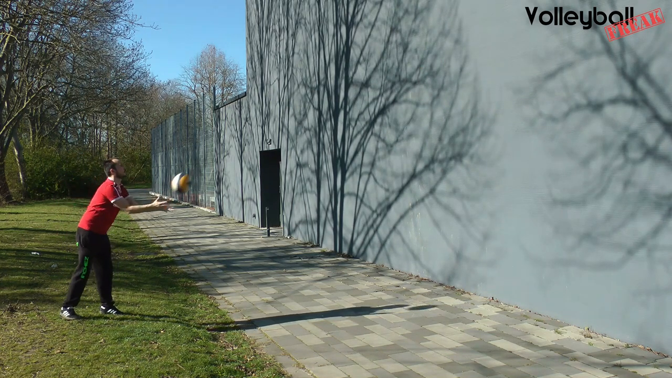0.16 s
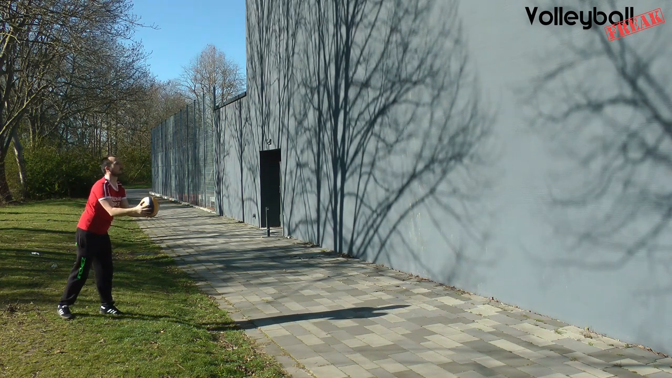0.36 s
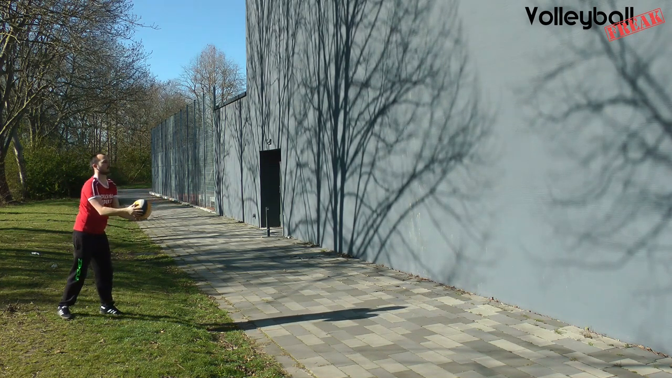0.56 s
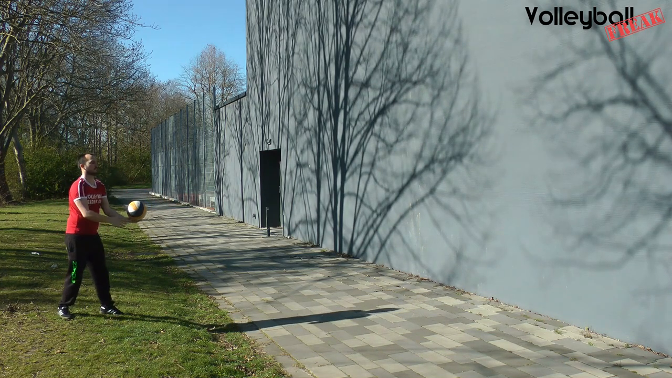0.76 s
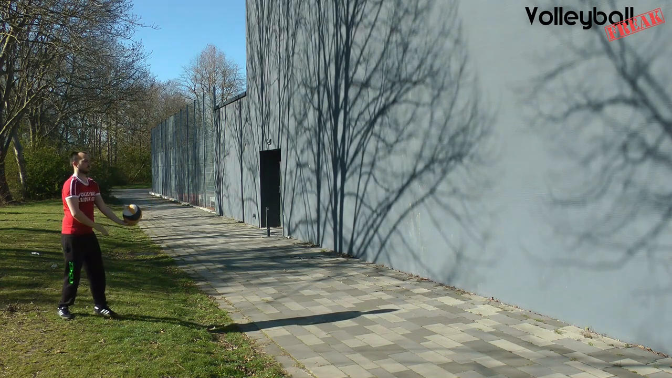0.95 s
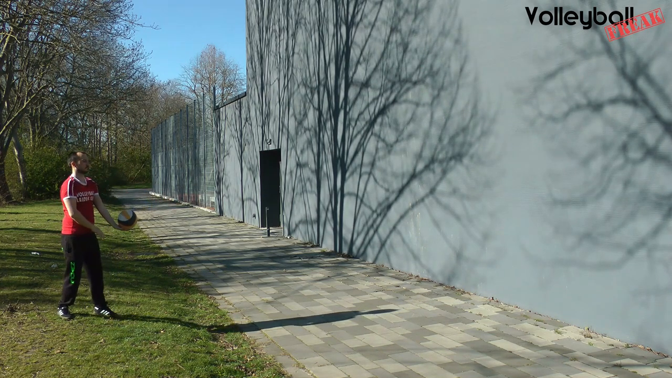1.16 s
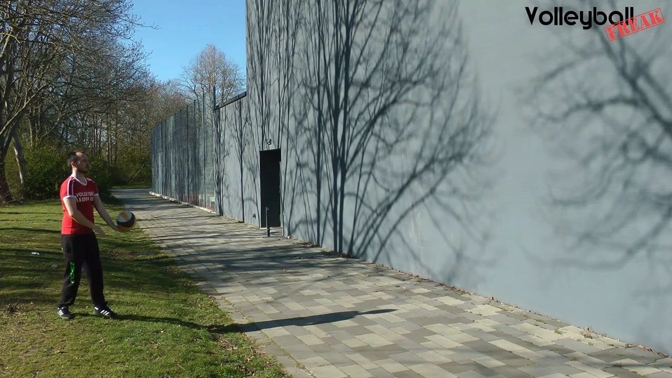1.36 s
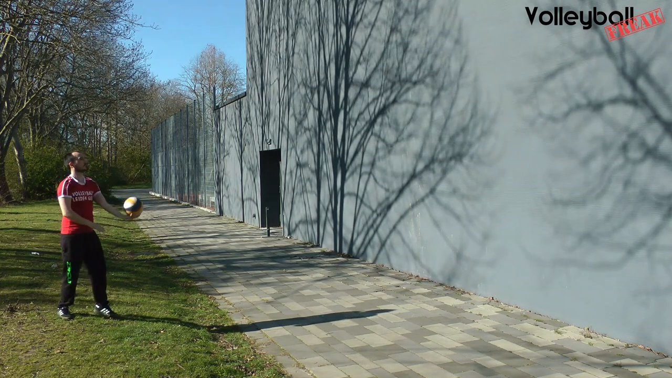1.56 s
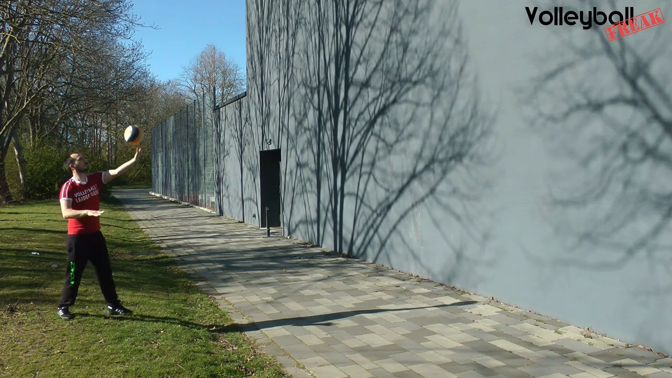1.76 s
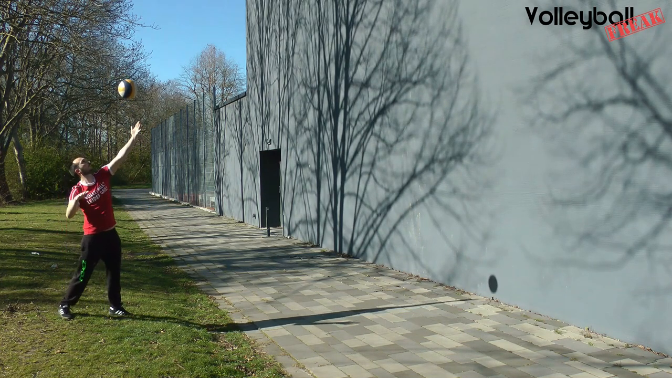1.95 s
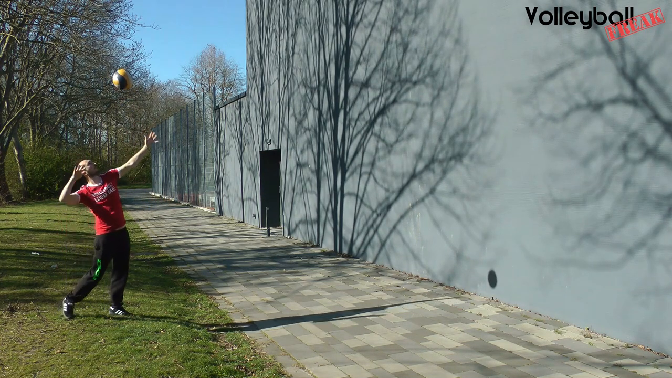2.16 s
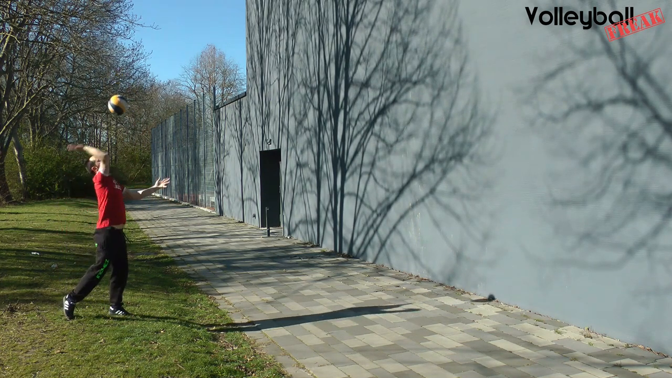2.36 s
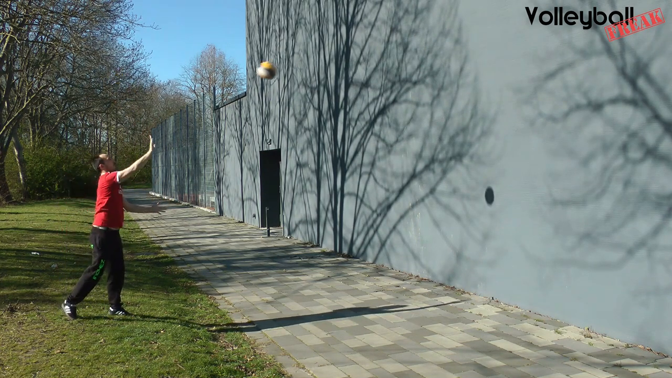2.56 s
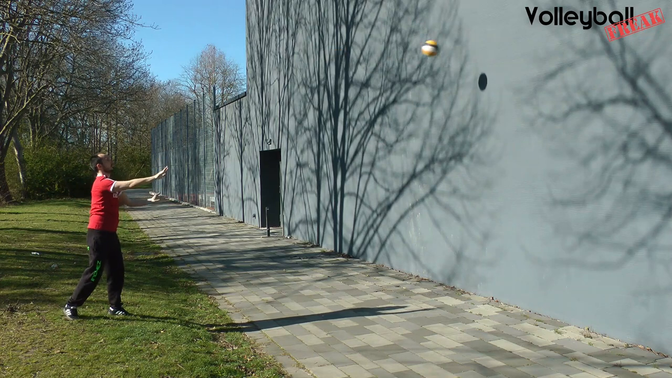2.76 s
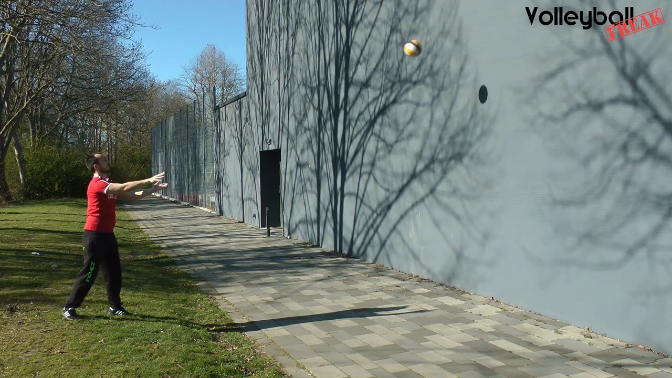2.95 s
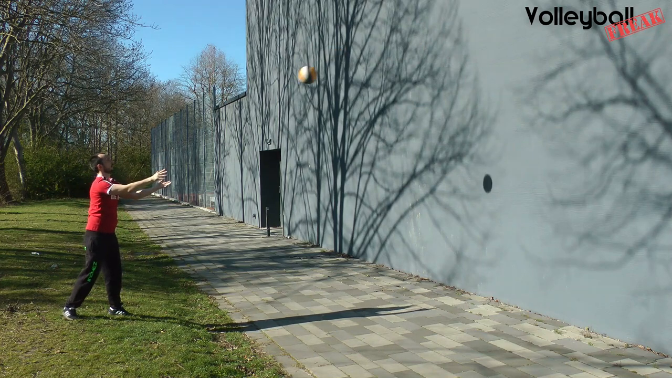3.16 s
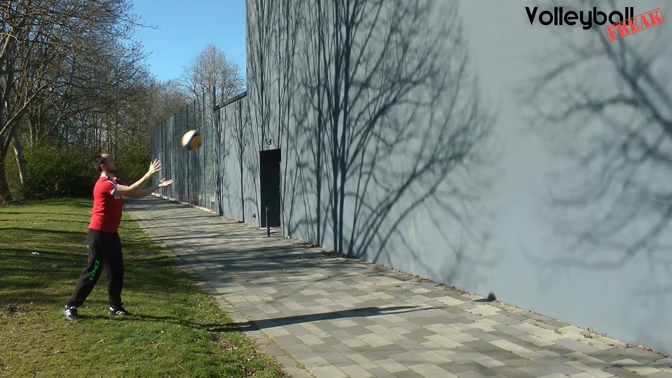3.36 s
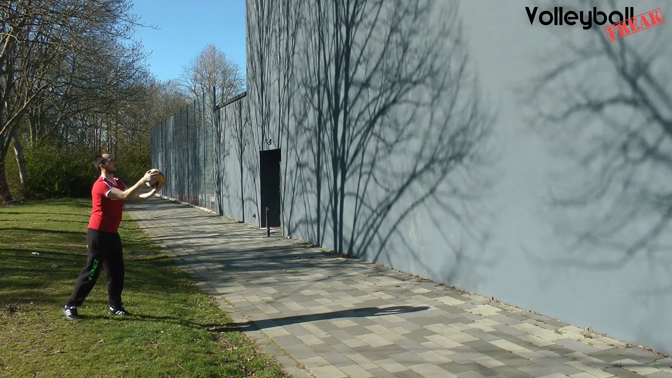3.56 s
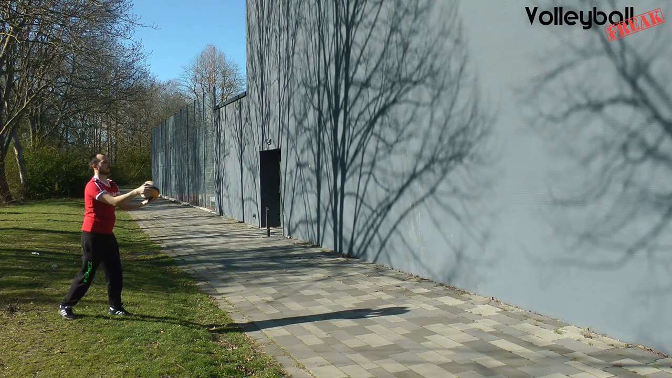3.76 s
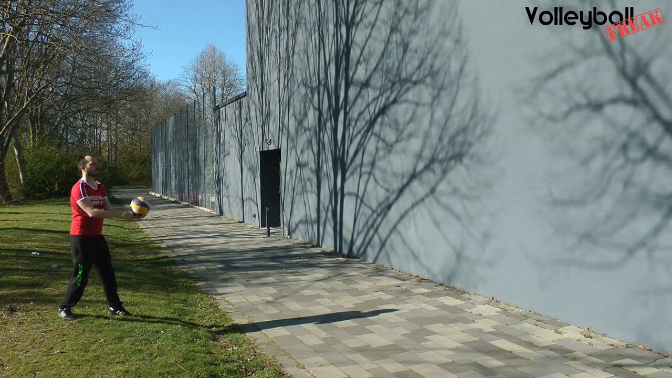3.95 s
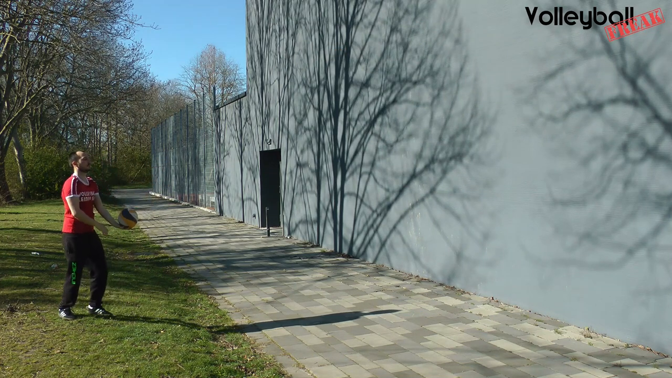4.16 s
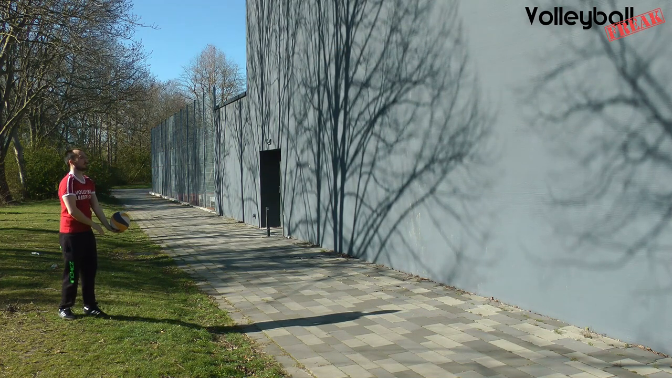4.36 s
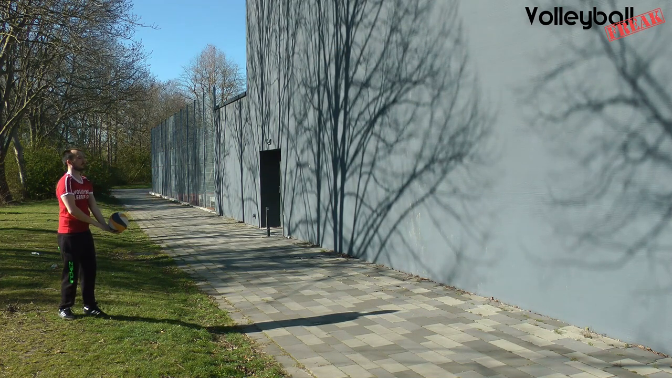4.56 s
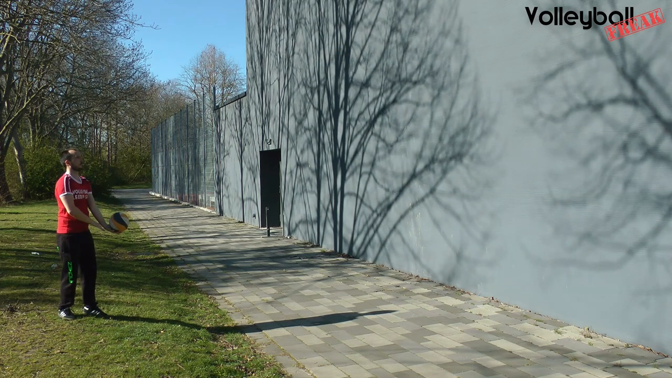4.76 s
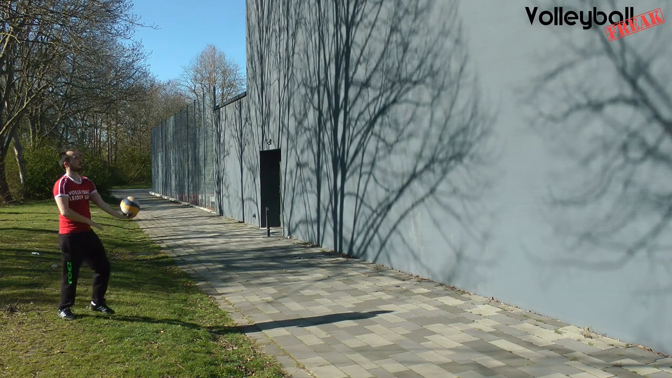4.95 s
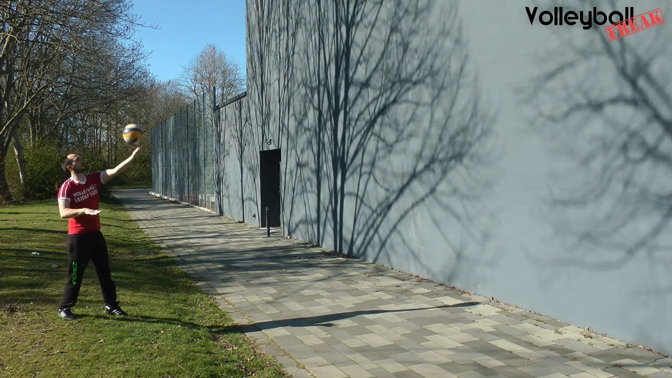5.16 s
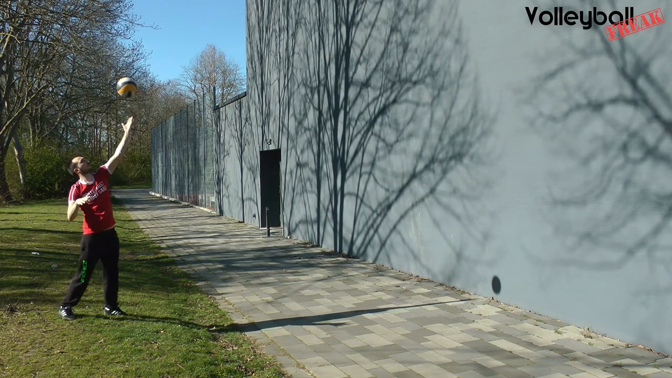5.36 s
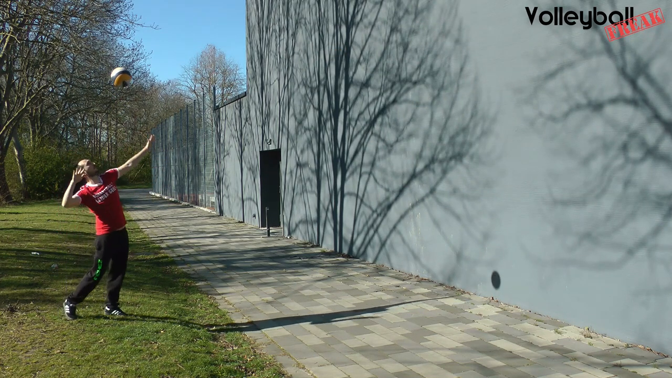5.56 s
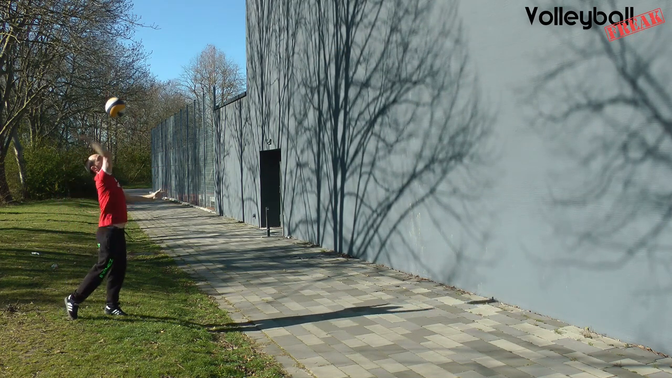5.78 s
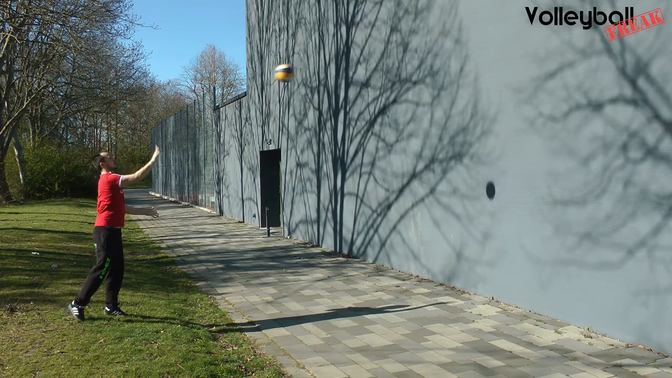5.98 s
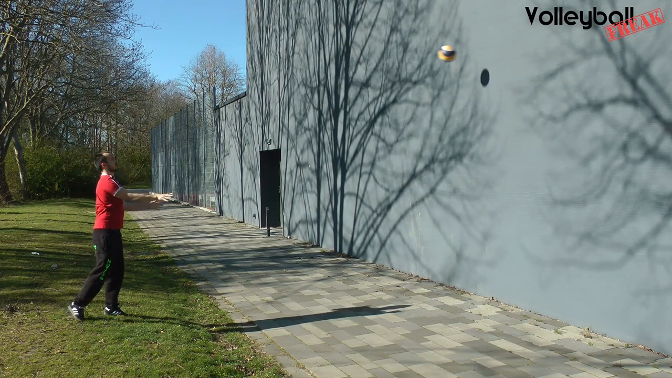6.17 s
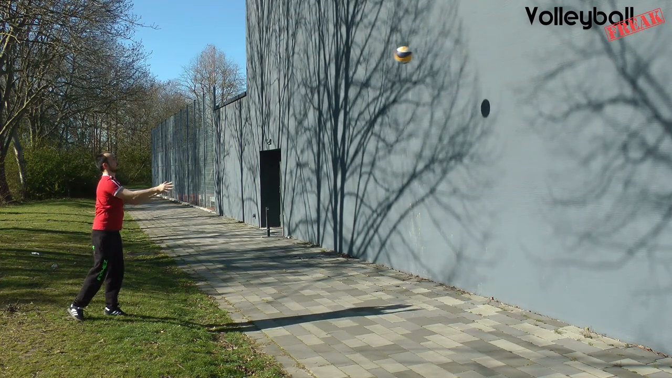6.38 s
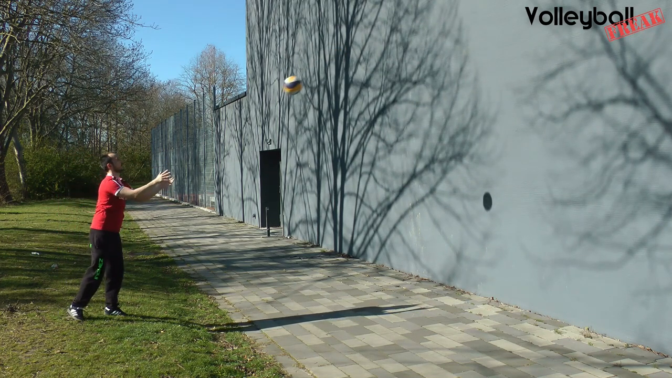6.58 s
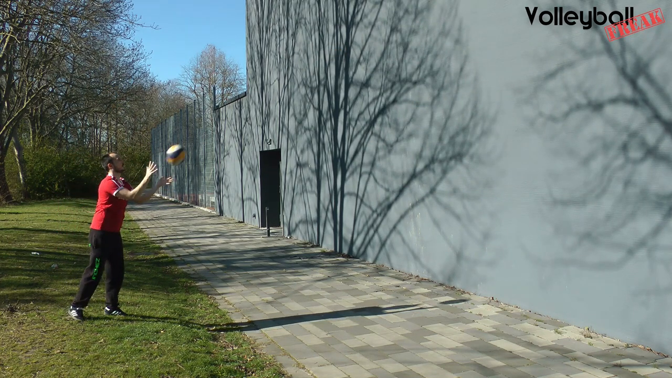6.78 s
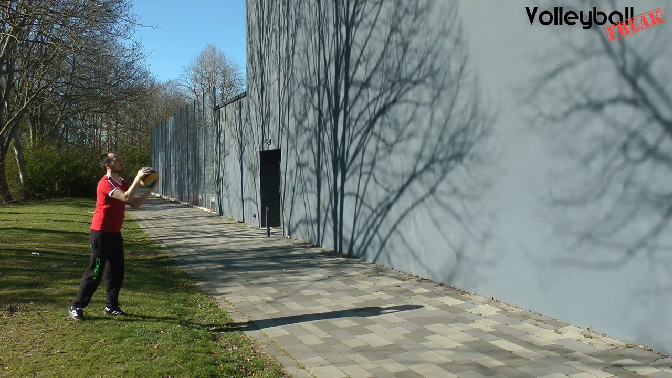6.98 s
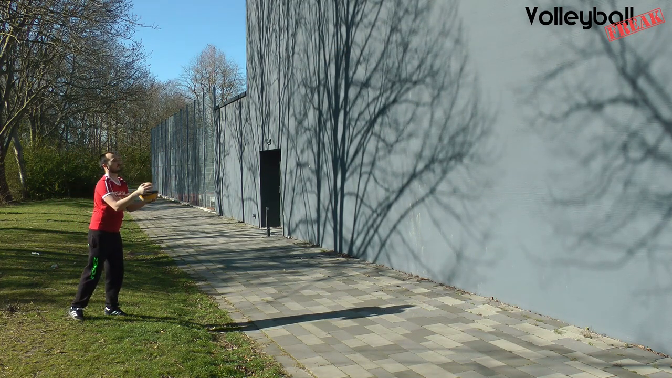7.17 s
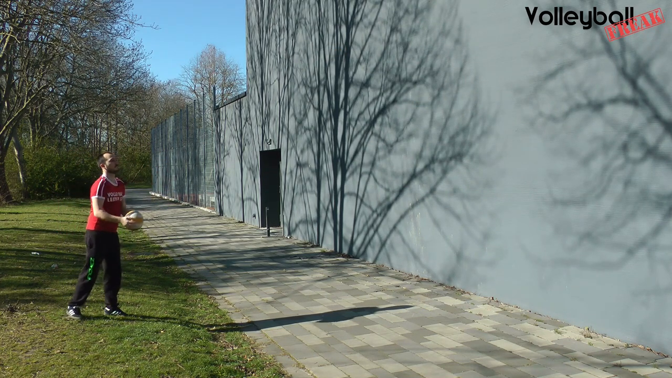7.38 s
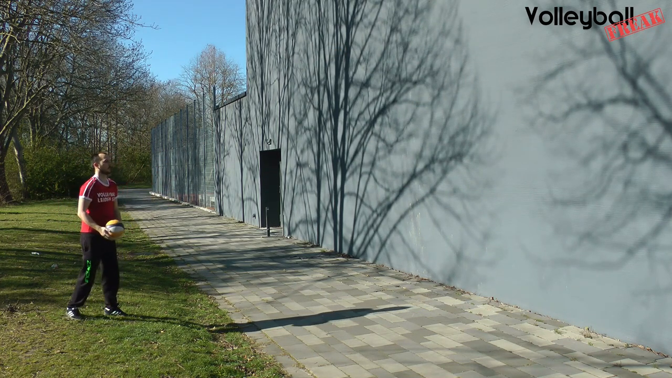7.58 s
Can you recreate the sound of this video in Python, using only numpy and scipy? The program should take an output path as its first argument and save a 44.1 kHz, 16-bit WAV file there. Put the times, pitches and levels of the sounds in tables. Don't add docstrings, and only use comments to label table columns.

```python
import sys
import numpy as np
from scipy import signal
from scipy.fft import rfft, irfft
from scipy.io import wavfile

SR = 44100
rng = np.random.default_rng(int(sys.argv[2]) if len(sys.argv) > 2 else 0)


def natural_amplitude(level_db):
    exponent = np.asarray(level_db, float) / 20
    return 10 ** exponent


def wrap_up_sound(samples):
    columns = np.atleast_2d(samples).T
    tamed = np.clip(columns, -1, 1)
    steps = np.round(tamed * 32767).astype(np.int16)
    wavfile.write(sys.argv[1], SR, steps)


N = 336042
TIME = np.arange(N) / SR

# (time [s], level [dB])
BUSTLE = [(0.0, -62), (0.21, -62.5), (1.21, -65), (1.66, -64.5), (1.87, -61.5), (2.25, -63.5), (2.57, -59),
          (2.72, -63.5), (3.46, -61), (3.63, -63), (3.88, -62.5), (5.37, -60.5), (5.58, -62), (5.88, -61.5),
          (5.98, -62.5), (7.62, -63)]
# (frequency [Hz], density [dB per Hz])
RUMBLE_COLOUR = [(13, -36), (22, -13.5), (43, 0.5), (76, -3), (108, 0), (135, -6), (241, -10), (300, -13)]
# (frequency [Hz], density [dB per Hz])
TRAFFIC_COLOUR = [(241, -9.5), (300, -12.5), (596, -14.5), (1180, -18), (1840, -23), (7470, -30.5),
                  (9570, -30.5), (15700, -32.5)]
# (frequency [Hz], density [dB per Hz])
WIDTH_COLOUR = [(13, -38.5), (22, 4), (53, 5), (76, -6.5), (140, -5.5), (263, -8.5), (585, -14),
                (16000, -28.5)]
# (time [s], length [s], level [dB], pitch [Hz])
BIRD_CALLS = [
    (4.269, 0.36, -65.5, 1092),
    (4.693, .31, -59, 1150),
    (5.156, 0.34, -60, 1185),
    (5.5, 0.096, -63, 1184),
]
# (time [s], peak [dB], thud [Hz])
FOOTFALLS = [(0.062, -45.5, 88.9), (0.414, -38, 91), (0.571, -46, 69.6), (0.776, -44, 84), (1.664, -48, 99),
             (1.759, -50, 90), (1.881, -41, 83), (2.345, -41, 88.3), (2.532, -41, 70), (3.83, -47, 68),
             (3.933, -35.5, 84.6), (4.039, -40.5, 90), (5.1, -47, 99), (5.25, -51.5, 112),
             (5.703, -32.5, 107.5), (5.801, -37.5, 83.5), (6.67, -44, 60), (7.295, -36.5, 93),
             (7.379, -36.5, 150), (7.42, -38.5, 69.7), (7.529, -40.5, 55.2)]
# (time [s], peak [dB], knock [Hz], tick [dB])
TOUCHDOWNS = [(.125, -44, 600, -53), (.576, -45, 686, -50), (1.96, -38, 250, -60), (2.22, -32, 364, -72),
              (2.351, -37.5, 250, -80), (2.393, -40, 500, -61), (3.327, -42, 600, -54),
              (4.269, -50, 600, -55), (5.551, -43, 520, -52), (5.628, -33.5, 395, -58),
              (5.6957, -58, 1200, -34.5), (5.7347, -14.5, 202, -33), (5.769, -54, 500, -44),
              (5.864, -44, 600, -60), (6.727, -46.5, 600, -53), (6.966, -46, 600, -49),
              (7.38, -51, 250, -58)]
# (time [s], length [s], level [dB], top [Hz])
RUSTLES = [
    (1.7, .12, -61, 4000),
    (4.9, .04, -61.5, 7000),
    (5.04, .04, -63, 12000),
    (5.29, .04, -66, 4000),
    (5.7345, .04, -46.5, 16000),
]
# (frequency [Hz], density [dB per Hz])
RUB_COLOUR = [(180, -16), (300, -5.5), (994, -14), (1140, -26.5), (6200, -23), (14200, -27.5),
              (16000, -30.5)]
# (frequency [Hz], density [dB per Hz])
SCATTER_COLOUR = [(150, 7), (500, 6.5), (1200, -0.5), (3000, -7), (5000, -15.5), (8000, -23.5),
                  (15000, -36.5)]
# (frequency [Hz], density [dB per Hz])
CRACK_COLOUR = [(500, -4), (1500, 5), (3500, -4.5), (6000, -10.5), (9000, -9.5), (12500, -10.5),
                (15500, -13)]
# (frequency [Hz], level [dB])
PANEL_MODES = [(54, -7), (66, 8), (92, -10)]
# (frequency [Hz], density [dB per Hz])
LOOSE_PANEL = [(30, -31), (60, 5), (110, -16), (260, -30.0), (900, -85.0)]
# (time [s], palm rub [dB], scatter [dB])
BLOW_TRAILS = [
    (.273, -54, -38),
    (.3, -46.5, -41.5),
    (2.486, -50, -33),
    (2.913, -69, -34.5),
    (3.494, -41.5, -36),
    (3.524, -42, -33),
    (5.89, -52, -28),
    (6.311, -54, -32.5),
    (6.9, -41.5, -35),
]
# (start [s], spot)
BALL_SPOTS = [
    (0, "chest"),
    (2, "overhead"),
    (2.8, "wall"),
    (3.3, "chest"),
    (5.8, "overhead"),
    (6.2, "wall"),
    (6.7, "reach"),
]
# (ground delay [ms], ground [dB], wall delay [ms], wall [dB], ground echo top [Hz])
OVERHEAD_PATHS = (12.3, -7, 26, -19, 1500)
WALL_PATHS = (5.4, -2, 15.5, -24, 2200)
CHEST_PATHS = (9, -14, 27, -20.5, 1501)
REACH_PATHS = (17.5, -6, 57.5, -28.5, 504.5)
# (frequency [Hz], T60 [s], level [dB])
AIR_MODES = [(1120, 0.15, 0), (3152, 0.55, 0), (3872, 0.33, -2), (4150, 0.22, 0), (4568, .3, 0)]
# (time [s], lowest mode [dB], second mode [dB], upper modes [dB])
GRIP_RINGS = [
    (.3, -45, -60, -57),
    (2.485, -59, -60, -61),
    (2.913, -62, -66, -72),
    (3.522, -55, -52, -55),
    (5.889, -65, -58, -61),
    (6.315, -60, -68, -72),
    (6.899, -58, -47, -55),
]
# (time [s], strength [dB], palm [Hz], fingers [Hz], fingers over palm [dB])
SERVE_BLOWS = [
    (2.4847, 0, 1250, 3400, -2),
    (5.8894, 0, 1450, 2500, 3),
]
# (level [dB], T60 [ms], crack [dB])
SERVE_CONTACTS = [
    (-8, 3.8, -10),
    (0, 2.5, -19),
    (-10, 6.7, -29.5),
    (-14, 5.6, -27.5),
]
SERVE_DELAYS = (0, .9, .4, 3.4)
# (delay [ms], level [dB], frequency [Hz], T60 [s])
SERVE_THUMP = (1.1, -1, 115, .088)
# (time [s], strength [dB], skin [Hz])
WALL_BLOWS = [
    (2.9119, 0, 730),
    (6.3119, 0, 650),
]
# (delay [ms], level [dB], multiple of skin
# frequency, T60 [ms], crack [dB])
WALL_CONTACTS = [
    (0, -4, .95, 5.5, -39),
    (.6, -18, 1.9, 11, -43),
    (.2, -22, 4.7, 6, -46),
    (5.4, -15, 6, 1.6, -30),
]
# (delay [ms], level [dB], frequency [Hz], T60 [s])
WALL_THUMP = (1.5, -10, 134, 0.06)
# (time [s], level [dB], slap [Hz], T60 [ms])
HAND_SLAPS = [(0.2703, -7, 1500, 5.8), (0.2718, -12, 466, 15), (.2734, -8, 720, 5.5), (.278, -25, 647, 9.9),
              (0.288, -20.5, 500, 11), (0.2909, -14.5, 1450, 6.4), (.293, -16.5, 1330, 8.7),
              (3.4935, -2.5, 600, 5), (3.4949, -3, 1301, 8), (3.5201, -9.5, 1100, 6),
              (3.5221, -2, 3670, 3.3), (3.5218, -7, 5324, 3.4), (3.5222, -14, 2400, 4.6),
              (3.524, -19.5, 1200, 23), (3.548, -31, 1160, 15), (6.8975, 2.5, 467, 5),
              (6.8979, -15, 3460, 7.8), (6.9028, -9, 440, 6.8), (6.94, -28.5, 437, 15)]
# (time [s], level [dB], T60 [ms], lowest [Hz])
HAND_CRACKS = [(0.2704, -19.5, 26, 400), (0.2743, -21, 11, 397), (0.2902, -27.5, 30, 400),
               (3.495, -14, 8.4, 403), (3.5, -26.5, 8, 400), (3.521, -18.5, 8, 400.5),
               (3.5221, -23, 10, 400), (6.8978, -18, 5.2, 1510), (6.8996, -12.5, 9.7, 2600)]
# (time [s], level [dB], shell [Hz], T60 [s])
HAND_THUMPS = [(.2725, -19, 150, 0.087), (.272, -17.5, 64, 0.089), (.2766, -12, 268, 0.038),
               (.2986, -21, 262, 0.023), (.309, -21, 220, 0.026), (3.494, -7, 100.4, 0.039),
               (3.494, -16.5, 53.6, 0.16), (3.523, -15, 150, 0.06), (3.525, -15.5, 291, 0.041),
               (3.551, -19, 250, 0.012), (6.8988, -4.5, 59, 0.076), (6.9021, -22.5, 227, 0.078)]


def shaped(points, length, low_hz=20, high_hz=20000):
    hz = np.maximum(np.arange(length // 2 + 1) * SR / length, 1)
    point_hz, point_db = np.transpose(points)
    gain = natural_amplitude(np.interp(np.log(hz), np.log(point_hz), point_db))
    gain = gain / np.sqrt((1 + (low_hz / hz) ** 8) * (1 + (hz / high_hz) ** 8))
    noise = irfft(rfft(rng.standard_normal(length)) * gain, length)
    return noise / np.sqrt(np.mean(noise ** 2))


def drift(rate_hz):
    values = rng.standard_normal(int(N / SR * 60) + 2)
    return np.interp(TIME * np.clip(rate_hz, .1, 55), np.arange(len(values)), values)


def fade(t60, length=8192, rise=1e-4):
    t = np.arange(length) / SR
    return t, (1 - np.exp(-t / rise)) * natural_amplitude(-60 * t / t60)


def bump(t, peak_s, power):
    return (t / peak_s) ** power * np.exp(power - power * t / peak_s)


def add(out, s, sound):
    i = round(s * SR)
    out[i:i + len(sound)] += sound[:N - i]


def surroundings():
    traffic_db = np.interp(TIME, *np.transpose(BUSTLE))
    swing_db = traffic_db - traffic_db.mean()
    rumble_db = -57 - .2 * swing_db + 2.2 * drift(18)
    rumble = natural_amplitude(rumble_db) * shaped(RUMBLE_COLOUR, N, high_hz=250)
    traffic = natural_amplitude(traffic_db + 1.8 * drift(25)) * shaped(TRAFFIC_COLOUR, N, low_hz=250, high_hz=2850)
    hiss_db = -69 + .3 * swing_db + .7 * drift(30)
    hiss = natural_amplitude(hiss_db) * shaped(TRAFFIC_COLOUR, N, low_hz=3255, high_hz=15400)
    return rumble + traffic + hiss


def bird():
    rise_hz_per_s, edge_s = 60.5, .05
    out = np.zeros(N)
    for s, length, level_db, hz in BIRD_CALLS:
        edge = np.clip(np.minimum(TIME - s, s + length - TIME) / edge_s, 0, 1)
        climbing_hz = hz + rise_hz_per_s * np.clip(TIME - s, 0, length)
        for detune in (.95, 1, 1.06):
            pitch = climbing_hz * (detune + .045 * drift(40))
            tone = np.sin(2 * np.pi * np.cumsum(pitch) / SR)
            out += natural_amplitude(level_db - 2.5) * edge * drift(55) * tone
    return out


def footfalls():
    out = np.zeros(N)
    for s, level_db, hz in FOOTFALLS:
        t, thud = fade(0.17, rise=0.0046)
        lumps = shaped([(hz / 2, -10), (hz, 0), (hz * 2, -14), (hz * 8, -50)], 8192)
        add(out, s, natural_amplitude(level_db + 2.5) * thud * (np.sin(2 * np.pi * hz * t) + 0.76 * lumps))
    return out


def touchdowns():
    out = np.zeros(N)
    for s, level_db, hz, tick_db in TOUCHDOWNS:
        t, knock = fade(0.017, rise=0.00017)
        tick = fade(0.017)[1] * shaped(SCATTER_COLOUR, 8192, low_hz=600)
        add(out, s, -natural_amplitude(level_db) * knock * np.sin(2 * np.pi * hz * t) + natural_amplitude(tick_db) * tick)
    return out


def rub_stroke(rise_s, length_s):
    t = np.arange(8192) / SR
    return np.clip(t / rise_s, 0, 1) / (1 + (t / length_s) ** 8)


def scuffs():
    out = np.zeros(N)
    for s, length, level_db, top_hz in RUSTLES:
        grain = natural_amplitude(5.4 * np.repeat(rng.standard_normal(128), 64))
        rub = grain * shaped(RUB_COLOUR, 8192, low_hz=300, high_hz=top_hz)
        add(out, s, natural_amplitude(level_db) * rub_stroke(.003, length) * rub)
    grass = shaped(SCATTER_COLOUR, 8192, low_hz=355, high_hz=2090)
    add(out, 2.385, natural_amplitude(-48) * rub_stroke(0.032, .1) * grass)
    return out


def scatter():
    out = np.zeros(N)
    for s, _, scatter_db in BLOW_TRAILS:
        short_tail = fade(0.054, length=16384, rise=.004)[1]
        long_tail = natural_amplitude(-21.5) * fade(0.36, length=16384, rise=.02)[1]
        noise = shaped(SCATTER_COLOUR, 16384, low_hz=150)
        add(out, s, natural_amplitude(scatter_db + 10.5) * (short_tail + long_tail) * noise)
    return out


def wall():
    boom_db, wash_db, late_db, late_hz = -36.5, -51, -66.5, 3210
    out = np.zeros(N)
    for s, force_db, _ in WALL_BLOWS:
        t, decay = fade(0.8, length=16384, rise=0.0053)
        panel = sum(natural_amplitude(mode_db) * np.sin(2 * np.pi * hz * t) for hz, mode_db in PANEL_MODES)
        boom = decay / (1 + (t / 0.28) ** 6) * (panel + 2.1 * shaped(LOOSE_PANEL, 16384))
        bloom = bump(t, .07, 2) * natural_amplitude(2.5 * drift(55)[:16384])
        wash = bloom * shaped(SCATTER_COLOUR, 16384, low_hz=500, high_hz=5600)
        swell = bump(t, .13, 3) * natural_amplitude(5 * drift(45)[:16384])
        late = swell * np.sin(2 * np.pi * late_hz * t)
        add(out, s, natural_amplitude(force_db) * (natural_amplitude(boom_db) * boom + natural_amplitude(wash_db) * wash + natural_amplitude(late_db) * late))
    return out


def echoes(ball):
    far_ms, far_db = 69, -27
    spots = {"chest": CHEST_PATHS, "overhead": OVERHEAD_PATHS, "wall": WALL_PATHS, "reach": REACH_PATHS}
    starts = [round(s * SR) for s, _ in BALL_SPOTS] + [N]
    near_smear = fade(0.003, length=256)[1] / 6
    rough_wall = shaped(CRACK_COLOUR, 256, low_hz=296.7) * near_smear
    far_smear = fade(0.0077, length=1024, rise=0.0023)[1] / 12
    far_wall = shaped(CRACK_COLOUR, 1024, low_hz=1200, high_hz=8000) * far_smear
    out = ball.copy()
    for (s, spot), a, b in zip(BALL_SPOTS, starts, starts[1:]):
        ground_ms, ground_db, wall_ms, wall_db, top_hz = spots[spot]
        part = ball[a:b]
        dull = signal.sosfilt(signal.butter(1, top_hz, fs=SR, output="sos"), part)
        add(out, s + ground_ms / 1000, natural_amplitude(ground_db) * dull)
        add(out, s + wall_ms / 1000, natural_amplitude(wall_db) * signal.fftconvolve(part, rough_wall))
        add(out, s + far_ms / 1000, natural_amplitude(far_db) * signal.fftconvolve(part, far_wall))
    return out


def air_rings():
    out = np.zeros(N)
    for s, low_db, second_db, upper_db in GRIP_RINGS:
        grips_db = [low_db, second_db] + [upper_db] * 3
        for (hz, t60, mode_db), grip_db in zip(AIR_MODES, grips_db):
            t, ring = fade(t60, length=16384, rise=0.012)
            waver = natural_amplitude(3.5 * drift(30)[:16384])
            add(out, s, natural_amplitude(mode_db + grip_db) * ring * waver * np.sin(2 * np.pi * hz * t))
    return out


def palm_rubs():
    out = np.zeros(N)
    for s, rub_db, _ in BLOW_TRAILS:
        rub = fade(0.11, length=16384, rise=0.0029)[1] * shaped(RUB_COLOUR, 16384, low_hz=2500)
        add(out, s, natural_amplitude(rub_db) * rub)
    return out


def thumps():
    out, blows = np.zeros(N), list(HAND_THUMPS)
    for hits, (ms, level_db, hz, t60) in ((SERVE_BLOWS, SERVE_THUMP), (WALL_BLOWS, WALL_THUMP)):
        blows += [(s + ms / 1000, level_db + force_db, hz, t60) for s, force_db, *_ in hits]
    for s, level_db, hz, t60 in blows:
        t, body = fade(t60, length=16384, rise=0.00073)
        add(out, s, natural_amplitude(level_db) * body * np.cos(2 * np.pi * hz * (t - .0012)))
    return out


def slap(hz, t60_ms):
    t, ring = fade(t60_ms / 1000, length=2048)
    return -natural_amplitude(2) * ring * np.sin(2 * np.pi * hz * t)


def crack(t60_ms, low_hz=400):
    return shaped(CRACK_COLOUR, 2048, low_hz=low_hz) * fade(t60_ms / 1000, length=2048)[1]


def catches():
    out = np.zeros(N)
    for s, level_db, hz, t60_ms in HAND_SLAPS:
        add(out, s, natural_amplitude(level_db) * slap(hz, t60_ms))
    for s, level_db, t60_ms, low_hz in HAND_CRACKS:
        add(out, s, natural_amplitude(level_db) * crack(t60_ms, low_hz))
    return out


def wall_slaps():
    out = np.zeros(N)
    for s, force_db, hz in WALL_BLOWS:
        for ms, level_db, multiple, t60_ms, crack_db in WALL_CONTACTS:
            skin = natural_amplitude(level_db) * slap(multiple * hz, t60_ms) + natural_amplitude(crack_db) * crack(6.4)
            add(out, s + ms / 1000, natural_amplitude(force_db) * skin)
    return out


def serves():
    heel_hz, let_go_hz, crack_ms = 950, 780, 4.35
    out = np.zeros(N)
    for s, force_db, palm_hz, fingers_hz, lean_db in SERVE_BLOWS:
        parts = [(heel_hz, 0), (palm_hz, -lean_db), (fingers_hz, lean_db), (let_go_hz, 0)]
        for ms, contact, (hz, shift_db) in zip(SERVE_DELAYS, SERVE_CONTACTS, parts):
            level_db, t60_ms, crack_db = contact
            skin = natural_amplitude(level_db + shift_db) * slap(hz, t60_ms) + natural_amplitude(crack_db) * crack(crack_ms)
            add(out, s + ms / 1000, natural_amplitude(force_db) * skin)
    return out


def scene():
    around = surroundings() * natural_amplitude([[.4], [-.4]]) + bird()
    spread = natural_amplitude(-65.5) * shaped(WIDTH_COLOUR, N) * [[1], [-1]]
    feet = footfalls() + touchdowns() + scuffs()
    ball = air_rings() + palm_rubs() + thumps() + catches() + wall_slaps() + serves()
    player = echoes(ball) + scatter() + wall() + feet
    return player + around + spread


def band_limit(x):
    return signal.sosfilt(signal.butter(12, 16970, fs=SR, output="sos"), x)


def record(dry):
    rounded = 1.452 * np.tanh(dry / 1.363)
    top_cut = signal.cheby2(10, 60, 17200, fs=SR, output="sos")
    return band_limit(signal.sosfilt(top_cut, rounded))


dry = scene()
out = record(dry)
wrap_up_sound(out)
```